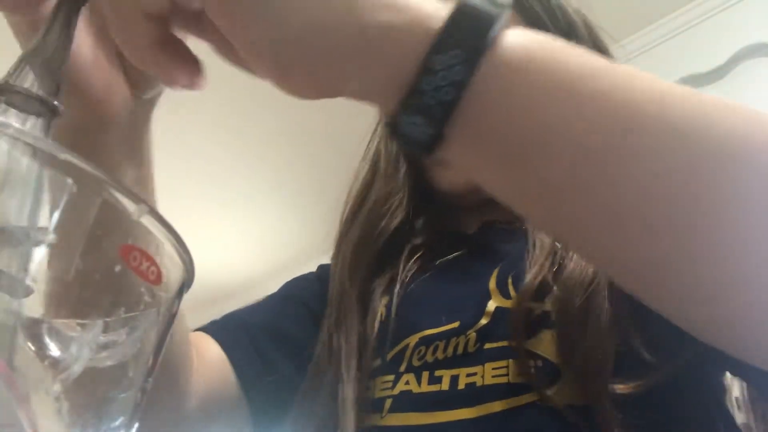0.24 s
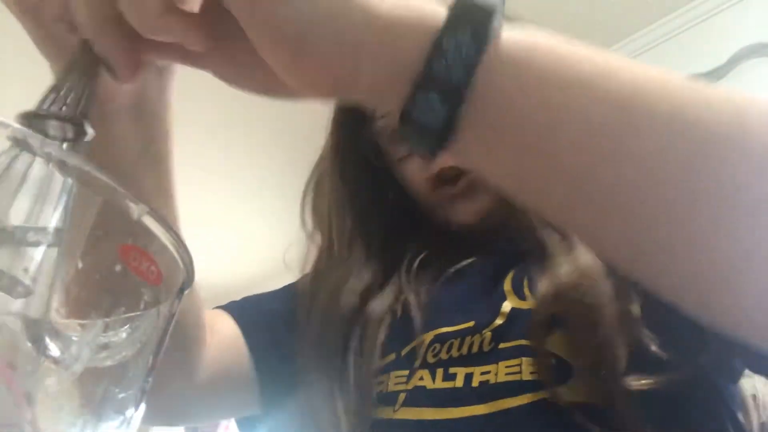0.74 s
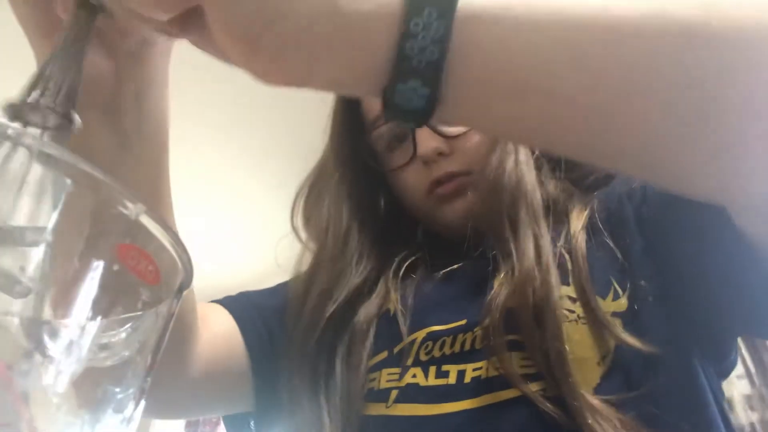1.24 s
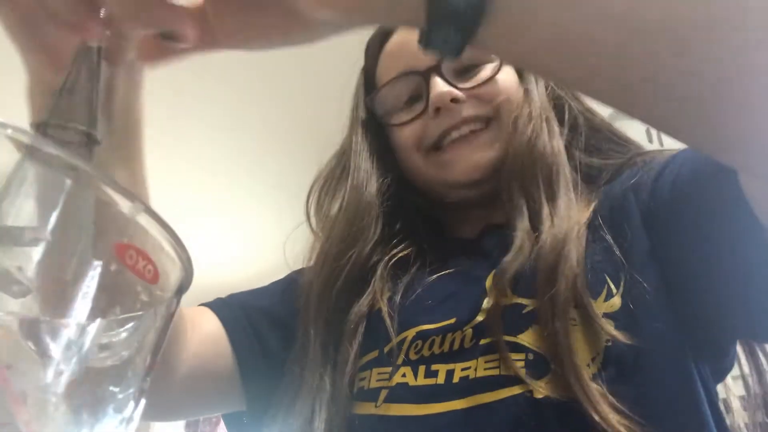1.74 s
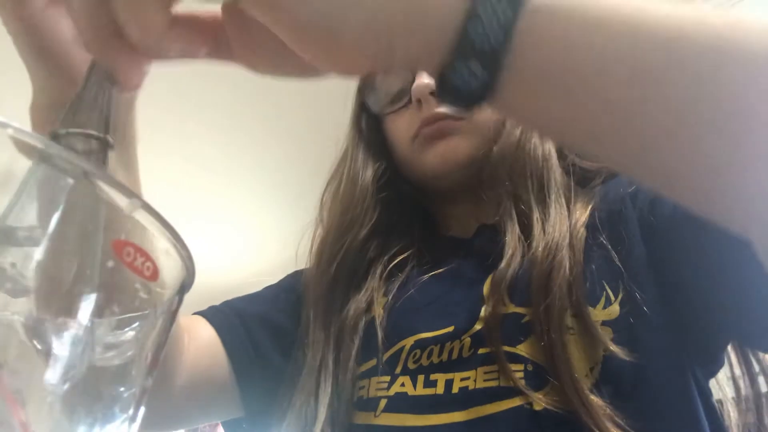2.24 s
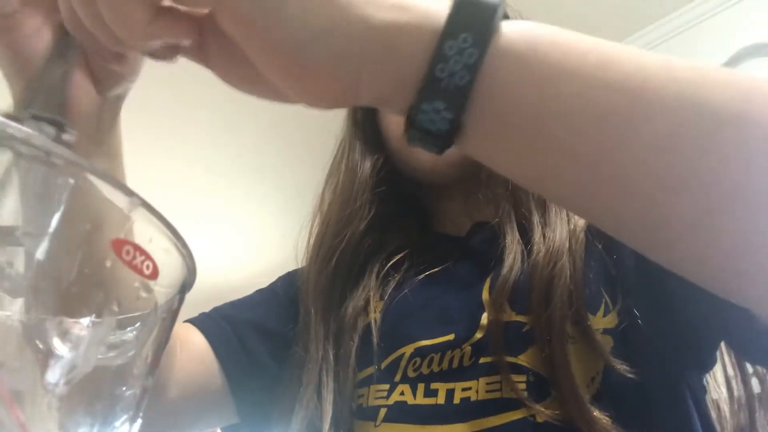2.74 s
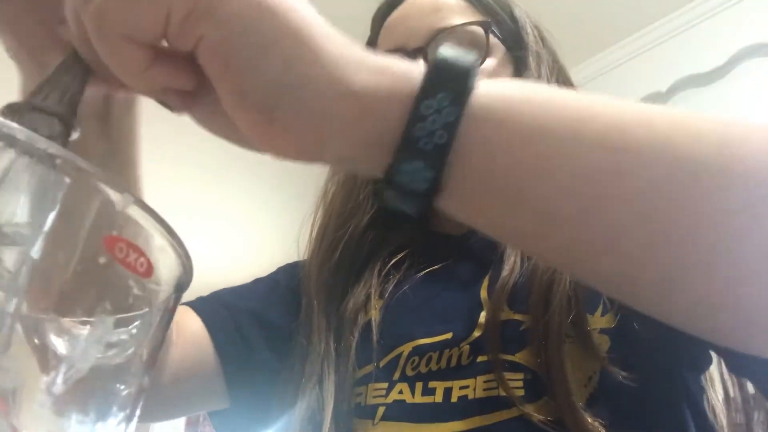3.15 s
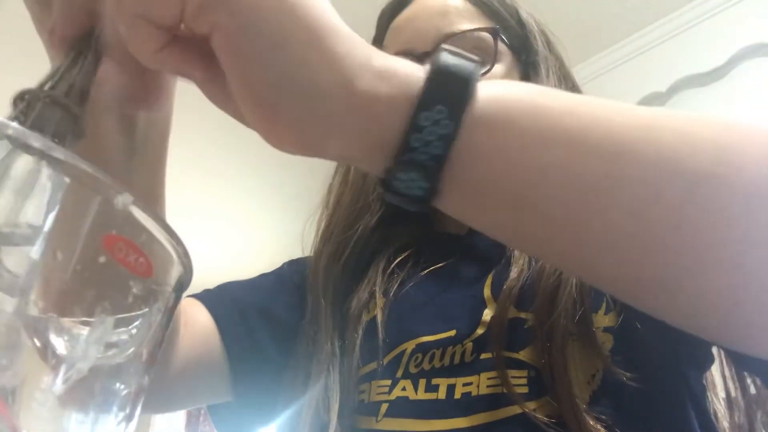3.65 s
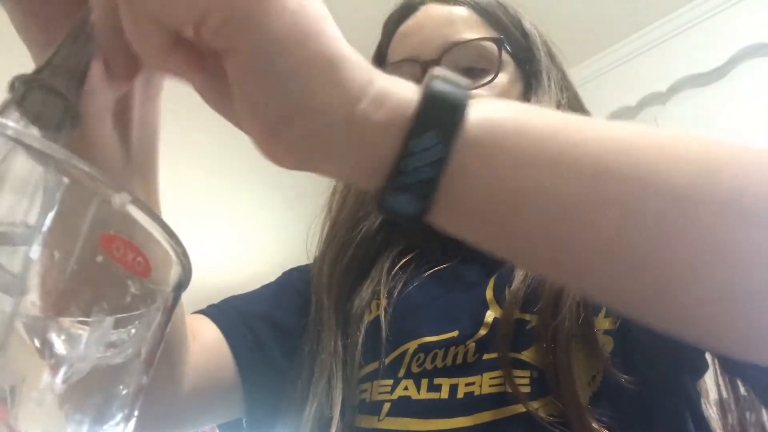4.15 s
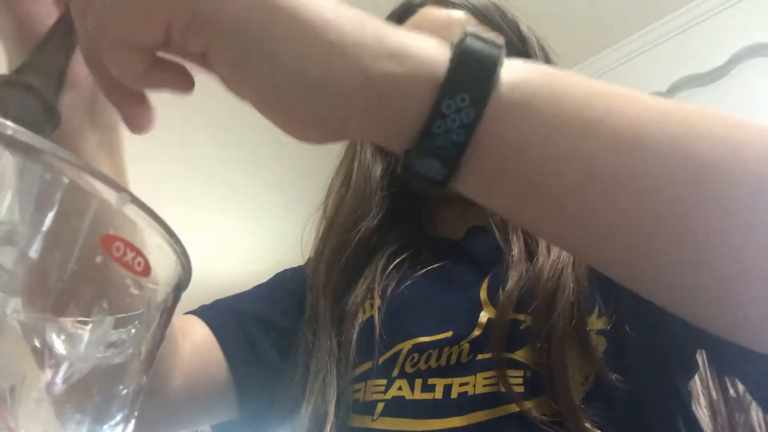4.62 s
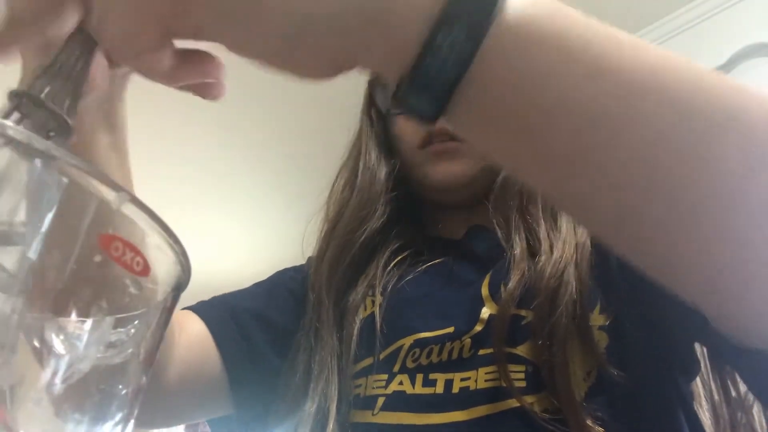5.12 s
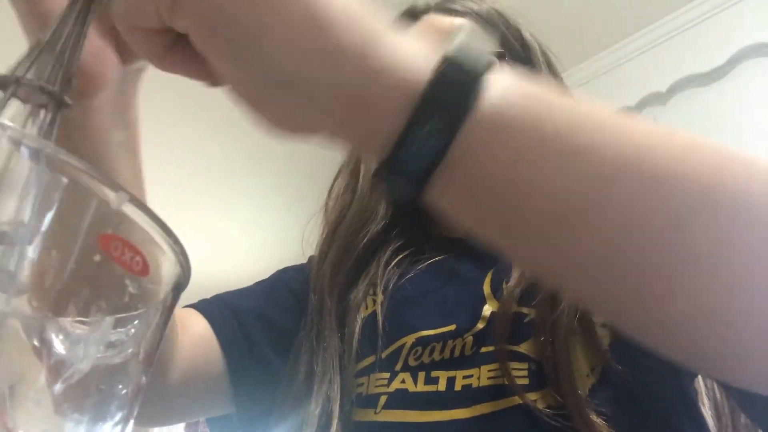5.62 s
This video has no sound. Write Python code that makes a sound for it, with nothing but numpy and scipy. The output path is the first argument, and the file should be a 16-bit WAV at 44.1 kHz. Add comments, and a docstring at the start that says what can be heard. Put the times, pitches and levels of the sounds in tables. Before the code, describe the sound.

A metal whisk twirls quickly in a glass measuring cup, its wires clacking and ticking brightly while a little liquid swishes, close up in a kitchen.

```python
"""Quick clusters of bright, glassy knocks: a steel whisk twirls to and fro in a glass measuring cup, close by.
Its wires tick and clack on the wall, chatter after a knock and scrape along it; the filled cup rings briefly.
The little liquid inside churns and swishes, and hard strokes bump the cup softly on the counter.
Knocks and bumps are made of fading sine waves and shaped noise; liquid, brushing and room tone are noise.
A small kitchen answers with a short, diffuse tail."""
import sys
import numpy as np
from scipy import signal
from scipy.fft import rfft, irfft, next_fast_len
from scipy.io import wavfile
from scipy.ndimage import map_coordinates

SR = 44100
rng = np.random.default_rng(int(sys.argv[2]) if len(sys.argv) > 2 else 0)


def to_wav(s):
    """Save 16-bit WAV."""
    ch = np.atleast_2d(s).T  # columns
    pcm = np.round(np.clip(ch, -1, 1) * 32767)  # PCM
    wavfile.write(sys.argv[1], SR, pcm.astype(np.int16))


N = 259087  # length of the sound [samples]
TOP_HZ = 15900  # nothing sounds above this
AGE = np.arange(SR // 4) / SR  # time since a contact [s]

# All colours below list (frequency [Hz], relative level [dB per Hz]).
# steady background: its colour
ROOM_TONE_COLOUR = [(12, -40), (70, 14), (200, 4.5), (400, 13.5), (1000, 8.5), (3000, 3), (7000, -8),
                    (10000, -20), (15700, -20)]
# how long the kitchen rings: (frequency [Hz], time to fall 60 dB [s])
KITCHEN_DECAY = [(150, 0.3), (1000, 0.24), (4000, 0.39), (8000, 0.28), (15000, 0.2)]
# how strongly the kitchen answers, weakest around 8 kHz: (frequency [Hz], gain [dB])
KITCHEN_GAIN = [(300, -14.5), (4000, -19.5), (8000, -22.0), (12000, -15)]
# a faint high brushing swells and fades: (middle [s], half length [s], level at the middle [dB])
BRUSH_SWELLS = [(0.064, 0.081, -55.5), (2.806, 0.054, -59)]
BRUSH_COLOUR = [(500, -25), (2000, -4), (4200, 0), (5500, -7), (7200, -1), (9000, -18), (15700, -28)]
# how deep the whisk digs into the liquid, heard in the churn: (time [s], change of churn level [dB])
DIG_DEPTH = [(0, 4.5), (1.0, 0.5), (1.8, 1), (2.4, -0.5), (3.3, -3.5), (4.2, -8.5), (5.87, -2.5)]
# the liquid's low churn and its brighter swish: two colours
CHURN_COLOUR = [(12, -70), (25, -38), (40, -28), (80, 2), (120, -3.5), (200, 5), (300, -5), (500, -11.5),
                (1200, -36), (4000, -70)]
SWISH_COLOUR = [(300, -14), (600, 10), (1050, 18.5), (1800, -4), (4200, -2), (5500, -23), (6900, -12.5),
                (10000, -29), (15700, -28)]
# the cup bumps on the counter: (time [s], peak level [dB], favoured pitch [Hz])
CUP_BUMPS = [(0.595, -29.5, 200), (1.201, -26.5, 206), (1.227, -27, 145), (1.753, -20.5, 197),
             (1.872, -26.5, 183), (2.085, -29, 196), (2.256, -25.5, 216), (2.409, -22.5, 211),
             (2.702, -26.5, 235), (3.051, -26, 186)]
# pitches of the counter: (frequency [Hz], relative level [dB], time to fall 60 dB [s])
COUNTER_MODES = [(88.5, -9, 0.28), (148, -7, 0.3), (199.7, 1, 0.14), (250.4, 3, 0.12), (334.4, -12.5, 0.37)]
# wires slide along the glass: (start [s], end [s], relative level [dB])
WIRE_SCRAPES = [(0.123, 0.2, -36.5), (1.347, 1.426, -28.5), (1.466, 1.485, -21), (1.878, 1.903, -21.5),
                (2.333, 2.347, -24.5), (4.472, 4.516, -27), (4.931, 4.99, -27.5), (5.54, 5.618, -31.5)]
# a wire meets the glass: (time [s], strength [dB], hardness [dB], favoured cup pitch [Hz])
# more hardness means more clack and tick for the same ring
WIRE_KNOCKS = [(0.001, -21, -6.5, 1040), (0.109, -27.5, -0.5, 1053), (0.179, -34, 2.0, 1185),
               (0.266, -22.5, 2.0, 980), (0.354, -23, -0.5, 1040), (0.439, -16, -4.5, 1050),
               (0.47, -18.5, 0.5, 1060), (0.477, -20, 4.0, 1080), (0.547, -19, 2.0, 1050),
               (0.595, -18, 5, 1210), (0.739, -20.5, -2.5, 1090), (0.826, -16.5, -2.5, 1040),
               (0.833, -28.5, 5.5, 990), (1.011, -16.5, 2, 1060), (1.103, -19.5, 2, 1040),
               (1.173, -10.5, 0.5, 1190), (1.201, -21, 6.0, 1030), (1.272, -24.5, 2, 990),
               (1.361, -26.5, 4.5, 1030), (1.4, -17.5, -7, 1040), (1.485, -19.5, -15, 1130),
               (1.498, -16, 5.5, 910), (1.652, -18.0, -3.5, 1020), (1.737, -15.5, 1, 1010),
               (1.751, -17.5, 0.5, 810), (1.777, -22, 3, 980), (1.782, -13, -1, 1070),
               (1.863, -15, 1.5, 1200), (2.017, -15.5, -2.5, 1040), (2.084, -17, 1.5, 920),
               (2.194, -16.5, -6.5, 1200), (2.245, -15.0, -2, 1150), (2.254, -19.5, 7, 1090),
               (2.3, -14.5, -3, 1000), (2.314, -19.5, -3, 990), (2.377, -15.5, 3, 1140),
               (2.4, -18, -3.5, 1120), (2.477, -18, -2.5, 1020), (2.637, -17.5, -5.5, 1090),
               (2.677, -15.5, 1.5, 1050), (2.831, -13.5, 0.0, 1080), (2.928, -17.5, 0, 1060),
               (2.962, -19, 4.5, 1130), (2.994, -28, -8, 960), (3.019, -13.5, 3.5, 1220),
               (3.026, -10, -4.5, 960), (3.044, -17, -4.5, 1130), (3.056, -18.5, 1.5, 1240),
               (3.066, -16.5, 0.5, 1080), (3.177, -21.5, 0.5, 960), (3.26, -22, 1.5, 900),
               (3.365, -30.5, -9, 1070), (3.444, -19, -0.5, 945), (3.521, -14.5, -3, 1100),
               (3.568, -17.0, -3, 880), (3.615, -14, -1.5, 1050), (3.699, -31, -1.0, 885),
               (3.773, -15, 6, 1130), (3.851, -12, -2.5, 1050), (3.878, -25.5, 1.5, 1120),
               (4.012, -21.5, -4, 1120), (4.063, -36.5, 12, 990), (4.076, -19.5, -0.5, 1030),
               (4.122, -21.5, -0.5, 950), (4.202, -15, 1, 1020), (4.301, -17.5, -1.5, 1020),
               (4.39, -20, -2.5, 870), (4.422, -17, 0, 870), (4.482, -23, -3, 940),
               (4.647, -20.5, -1.5, 910), (4.669, -20.5, -2.5, 1020), (4.708, -14.5, 0, 1130),
               (4.757, -19, 0, 1060), (4.818, -19, -2, 1000), (4.949, -17, -6, 1030),
               (4.974, -17.5, 1.5, 1230), (5.048, -16.5, 8, 1050), (5.153, -15.5, -2, 1040),
               (5.161, -21.5, 2, 1210), (5.233, -17.0, -2.5, 1150), (5.3, -22.5, -7, 1080),
               (5.319, -15.0, 2.5, 1050), (5.361, -22.0, 3, 1160), (5.435, -19, 0, 1100),
               (5.488, -27.5, -1, 1160), (5.536, -12.5, -2, 1040), (5.667, -20.5, -3.5, 1040),
               (5.725, -24.5, -1.5, 1030), (5.75, -14.5, -2, 1040), (5.855, -12.5, -1.0, 1030)]
# pitches of the cup, damped by hand and liquid: (frequency [Hz], relative level [dB], time to fall 60 dB [s])
CUP_MODES = [(513, -10.5, 0.082), (610, -8.5, 0.096), (743, -1.5, 0.083), (864.7, 1, 0.073),
             (965.6, 1.5, 0.065), (1033, 1, 0.048), (1233, 4.5, 0.058), (1282, 9, 0.019),
             (1553, -0.5, 0.052)]
# pitches of the wire loops: (frequency [Hz], relative level [dB], time to fall 60 dB [s])
WIRE_MODES = [(1564, 0.5, 0.048), (1792, -3.5, 0.052), (2060, -1.5, 0.036), (2330, -1.5, 0.042),
              (2565, -10, 0.067), (2803, -10, 0.026), (3254, -7, 0.023), (3712, -6, 0.039),
              (4450, 3, 0.013)]
# jangle of the wires, sharp contact, and highest treble of a hard contact: three colours
CLACK_COLOUR = [(60, -70), (200, -49), (450, -25), (1000, 7.5), (1700, 1.5), (2600, -1), (4500, -8),
                (5200, -17), (8000, -33), (14000, -43)]
TICK_COLOUR = [(1000, -48), (3000, -55), (5000, -0.5), (6000, -4), (6800, 4.5), (7300, -2.5), (8500, -9.5),
               (10400, -22), (11400, -19), (15700, -22)]
SNAP_COLOUR = [(2000, -40), (7000, -12), (9500, 8.5), (10400, -5), (11400, 2.5), (15700, -5)]
# the knock through the cup's foot, and the whole cup shaken by a heavy blow: two colours
THUMP_COLOUR = [(20, -64), (60, -18.5), (140, -12), (200, 2), (255, -2), (300, -10), (420, -8), (700, -15),
                (2000, -73)]
HOLLOW_COLOUR = [(100, -48), (330, -13.5), (480, -3.5), (650, 4.0), (900, -4), (2500, -55)]

# the struck wire's pitch is drawn at random for each knock: middle pitch, and the range to either side
WIRE_HZ, WIRE_OCTAVES = 2658, 0.726
# clack and tick, relative to strength plus hardness
CLACK_DB, TICK_DB = -4.0, -16.5
# chatter after a knock: average taps a second, level against the knock, time to die away
CHATTER_PER_S, CHATTER_DB, CHATTER_S = 90, -16, 0.022
# the liquid takes up each stroke and settles again
RISE_S, SETTLE_S = 0.0085, 0.28
# churn and swish, against the knocks that stir the liquid
CHURN_DB, SWISH_DB = -33, -32.5


def amp(db):
    """Turn decibels into a plain multiplier."""
    return 10 ** (np.asarray(db) / 20)


def along(points, hz):
    """Read values between (frequency, value) points on a log frequency axis."""
    f, v = np.transpose(points)
    return np.interp(np.log(hz + 1), np.log(f), v)


def filtered(x, gain):
    """Multiply each frequency of x by gain(frequency)."""
    size = next_fast_len(x.shape[-1] + 8192)  # spare room for the filter's own ringing
    spectrum = rfft(x, size) * gain(np.fft.rfftfreq(size, 1 / SR))
    return irfft(spectrum, size)[..., :x.shape[-1]]


def coloured(x, colour):
    """Shape the spectrum of x with a colour, then set the overall rms to 1."""
    y = filtered(x, lambda hz: amp(along(colour, hz)))
    return y / y.std()


def noise():
    """White noise as long as the scene."""
    return rng.standard_normal(N)


def wobble(rate):
    """A smooth random curve through `rate` random points a second."""
    points = rng.standard_normal(int(N * rate / SR) + 4)
    return map_coordinates(points, [np.arange(N) * rate / SR])


def fade(t60):
    """A decay of 60 dB in t60 seconds."""
    return np.exp(-np.log(1000) * AGE / t60)


def swell(seconds):
    """A soft start: most of the way up after this many seconds."""
    return 1 - np.exp(-AGE / seconds)


def blow(rows):
    """Scale each row to the energy of 10 ms at rms 1."""
    return rows / np.sqrt(np.sum(rows ** 2, axis=-1, keepdims=True) * 100 / SR)


def placed(times, rows):
    """Add up one track with each row starting at its time."""
    track = np.zeros(N + SR)
    for s, row in zip(times, rows):
        track[max(round(s * SR), 0):][:len(row)] += row
    return track[:N]


def ringing(modes, strongest_hz, boost_db, scatter_db, detune):
    """One row of fading pitches a blow; the contact point favours one pitch and shifts all strengths."""
    rows = np.zeros((len(strongest_hz), len(AGE)), np.float32)
    for hz, db, t60 in modes:
        strength, shift, side = rng.standard_normal((len(rows), 3)).T[:, :, None]
        favour = np.exp(-(np.log(hz / strongest_hz) / 0.13) ** 2)
        level = amp(db + boost_db * favour + scatter_db * strength)
        wave = np.sin((2 * np.pi * hz * (1 + detune * shift) * AGE).astype(np.float32))
        rows += np.sign(side) * level * wave * fade(t60)
    return rows


def slips(rate, spread_db, t60):
    """Stick and slip: tiny puffs of noise at random moments, `rate` a second on average."""
    happens = rng.random(N) < rate / SR
    kicks = happens * amp(spread_db * np.clip(rng.standard_normal(N), -2, 2))
    return signal.fftconvolve(kicks, fade(t60))[:N] * noise()


def agitation(rise_s, settle_s):
    """The motion that the knocks leave behind: each adds its energy, which builds up and dies away."""
    s, db = np.transpose(WIRE_KNOCKS)[:2]
    t = np.arange(SR) / SR
    response = (1 - np.exp(-t / rise_s)) * np.exp(-t / settle_s)
    knock_energy = placed(s, amp(db)[:, None] ** 2)
    return np.sqrt(np.abs(signal.fftconvolve(knock_energy, response ** 2)[:N]))


def rubbed(friction, cup_db, clack_db, tick_db):
    """Light contacts set the cup's pitches ringing, with the clack and hiss of the wire."""
    cup = sum((-1) ** k * amp(db) * np.sin(2 * np.pi * hz * AGE) * fade(t60)
              for k, (hz, db, t60) in enumerate(CUP_MODES))
    body = signal.fftconvolve(friction, cup)[:N]
    clack = amp(clack_db) * coloured(friction, CLACK_COLOUR)
    tick = amp(tick_db) * coloured(friction, TICK_COLOUR)
    return amp(cup_db) * body / body.std() + clack + tick


def burst(colour, envelope):
    """A fresh puff of noise for every knock stands for many crowded high pitches."""
    puffs = rng.standard_normal((len(WIRE_KNOCKS), len(AGE)))
    return blow(coloured(puffs, colour) * envelope)


def rebound(envelope, late, drop_db):
    """A springy wire touches once more within milliseconds, differently at each knock."""
    when, size = rng.random((len(WIRE_KNOCKS), 2)).T[:, :, None]
    # the delay is 0.27 to 1.27 times `late`, the drop 2 to 3 times `drop_db`
    again = np.interp(AGE - late * (0.27 + when), AGE, envelope, left=0)
    return np.hypot(envelope, amp(drop_db * (2.0 + size)) * again)


def room_tone():
    """Steady, faint shaped noise lies behind everything."""
    return amp(-53) * coloured(noise(), ROOM_TONE_COLOUR)


def kitchen(x, count=20):
    """Echoes blur into a diffuse tail; each stretch gets a freshly drawn one, so that no resonance repeats."""
    hz, t, z = signal.stft(rng.standard_normal((count, SR // 2)), SR, nperseg=256)
    decay = np.exp(-np.log(1000) * t / along(KITCHEN_DECAY, hz)[:, None])
    tails = signal.istft(z * decay, SR, nperseg=256)[1]
    pieces = np.pad(x, (0, -N % count)).reshape(count, -1)
    answers = signal.fftconvolve(pieces, tails / np.linalg.norm(tails[0]), axes=1)
    starts = np.arange(count) * pieces.shape[1] / SR
    tail = placed(starts + 0.012, answers)  # the answer comes 12 ms late
    return filtered(tail, lambda hz: amp(along(KITCHEN_GAIN, hz)))


def brushing():
    """Now and then soft, high noise swells and fades between the knocks."""
    t = np.arange(N) / SR
    level = sum(amp(db) * np.exp(-((t - s) / half) ** 2) for s, half, db in BRUSH_SWELLS)
    return level * coloured(noise(), BRUSH_COLOUR)


def liquid():
    """Every stroke sets the liquid churning and swishing, with small splashes off the wires."""
    motion = agitation(RISE_S, SETTLE_S)
    depth_db = np.interp(np.arange(N) / SR, *np.transpose(DIG_DEPTH))
    churn = amp(CHURN_DB + depth_db + 4.4 * wobble(17)) * coloured(noise(), CHURN_COLOUR)
    swish = coloured(noise(), SWISH_COLOUR)
    splashes = coloured(slips(rate=50, spread_db=8.5, t60=0.046), SWISH_COLOUR)
    swish_level = amp(SWISH_DB + 3.4 * wobble(11))
    return motion * (churn + swish_level * (swish + amp(0.5) * splashes))


def bumps():
    """A hard stroke rocks the cup, and the counter booms softly at its own low pitches."""
    s, db, hz = np.transpose(CUP_BUMPS)[:, :, None]
    boom = ringing(COUNTER_MODES, hz, boost_db=10, scatter_db=2.5, detune=0.024) * swell(0.016)
    boom = boom / np.abs(boom).max(axis=1, keepdims=True)
    return placed(s[:, 0] - 0.004, amp(db) * boom)  # the slow start begins 4 ms early


def scrapes():
    """A sliding wire feeds quick slips into the cup's pitches and hisses at the contact."""
    t = np.arange(N) / SR
    pressure = np.zeros(N)
    for start, end, db in WIRE_SCRAPES:
        corners = [start - 0.004, start + 0.0041, end - 0.004, end + 0.0028]
        pressure += amp(db) * np.interp(t, corners, [0, 1, 1, 0])
    friction = slips(rate=320, spread_db=0, t60=0.0068)
    return pressure * rubbed(friction, cup_db=-6.0, clack_db=-8.5, tick_db=-28)


def chatter():
    """After a knock the neighbouring wires tap the glass lightly, at random."""
    taps = slips(rate=CHATTER_PER_S, spread_db=2, t60=0.0082)
    contact = rubbed(taps, cup_db=4.5, clack_db=-0.5, tick_db=-15)
    return amp(CHATTER_DB) * agitation(0.017, CHATTER_S) * contact


def whisk():
    """Each contact is a sharp tick, a clack of the wires and a slower ring of the cup."""
    s, ring_db, hardness_db, cup_hz = np.transpose(WIRE_KNOCKS)[:, :, None]
    impact_db = ring_db + hardness_db
    tick_db = impact_db + TICK_DB + 2.1 * rng.standard_normal(s.shape)
    wire_hz = WIRE_HZ * 2 ** (WIRE_OCTAVES * rng.uniform(-1, 1, s.shape))

    cup = ringing(CUP_MODES, cup_hz, boost_db=8.0, scatter_db=2.0, detune=0.036)
    cup = blow(cup * swell(0.0021))

    # clack: one struck wire, the wire loops and a jangle of crowded pitches
    struck = blow(np.sin(2 * np.pi * wire_hz * AGE) * swell(0.00021) * fade(0.021))
    loops = ringing(WIRE_MODES, wire_hz, boost_db=3.0, scatter_db=5.5, detune=0.018)
    loops = blow(loops * swell(0.00065))
    jangle_shape = swell(0.00035) * (fade(0.027) + 0.65 * fade(0.073))
    jangle = burst(CLACK_COLOUR, rebound(jangle_shape, late=0.0071, drop_db=-10.5))
    clack = blow(loops + amp(-4.5) * struck + amp(4.5) * jangle)

    tick_shape = swell(0.00009) * (fade(0.01) + 0.18 * fade(0.063))
    tick = burst(TICK_COLOUR, rebound(tick_shape, late=0.0069, drop_db=-12.0))

    # harder contacts are shorter, so their highest treble grows faster than the rest
    snap_shape = swell(0.0001) * (fade(0.0026) + 0.23 * fade(0.064))
    snap = amp(1.564 * tick_db + 0.5) * burst(SNAP_COLOUR, snap_shape)

    # the cup's weight passes a little of every blow to the counter
    thump = burst(THUMP_COLOUR, swell(0.0049) * fade(0.2))

    # a heavy blow also shakes the whole cup, which makes it sound hollower
    hollow = amp(1.654 * ring_db) * burst(HOLLOW_COLOUR, swell(0.002) * fade(0.099))

    body = amp(ring_db) * (cup + amp(-17.5) * thump) + amp(-5.0) * hollow
    contact = amp(impact_db + CLACK_DB) * clack + amp(tick_db) * tick + snap
    return placed(s[:, 0], body + contact)


def scene():
    """The cup close by, the room far behind it; one channel."""
    near = bumps() + scrapes() + chatter() + whisk()
    return (room_tone() + kitchen(near) + brushing() + liquid() + near)[None]


def record(dry):
    """Round off the highest peaks and keep nothing above the top frequency."""
    rounded = dry / (1 + np.abs(dry) ** 6) ** (1 / 6)
    return filtered(rounded, lambda hz: hz < TOP_HZ)


dry = scene()
out = record(dry)
to_wav(out)
```